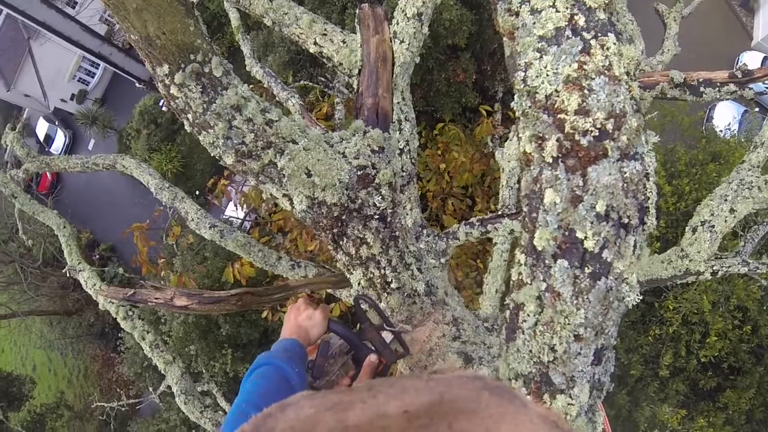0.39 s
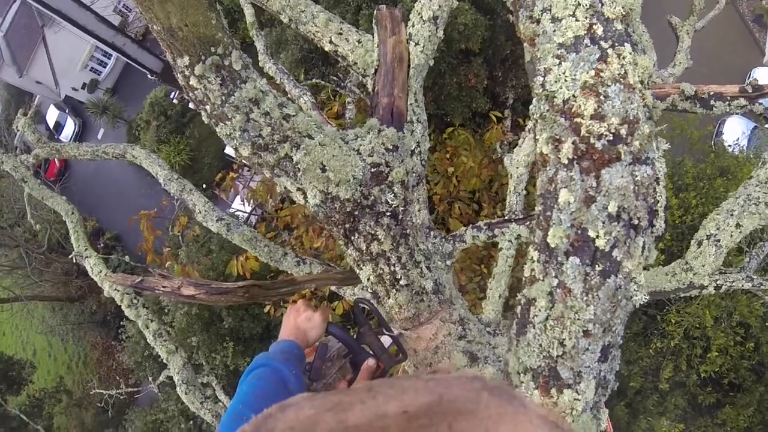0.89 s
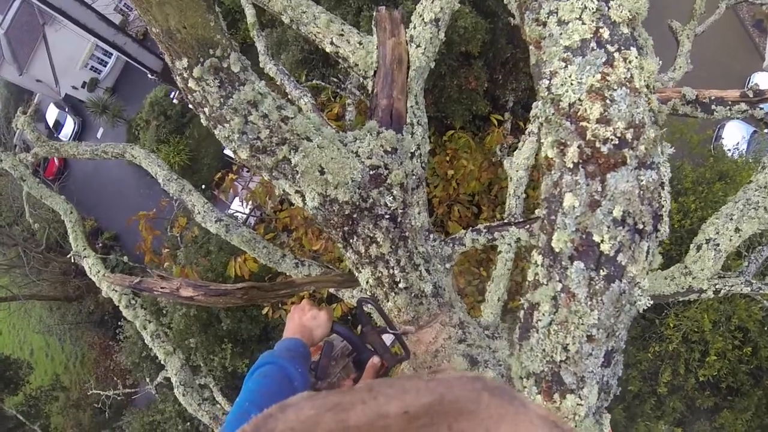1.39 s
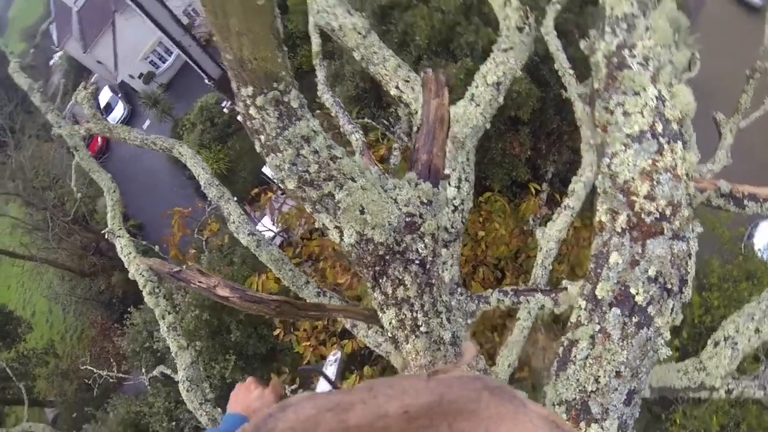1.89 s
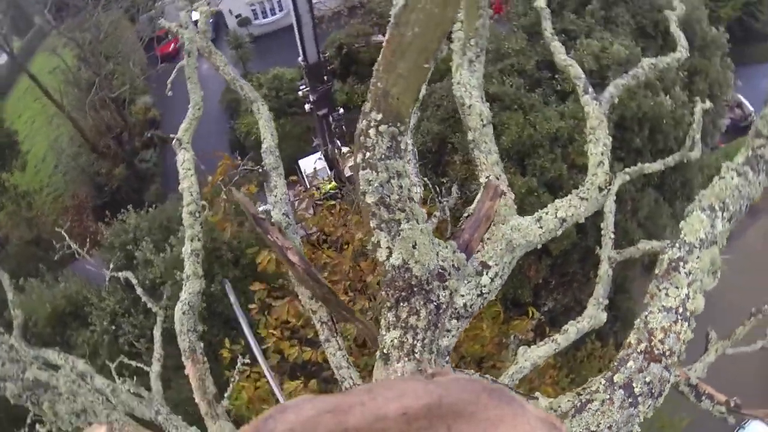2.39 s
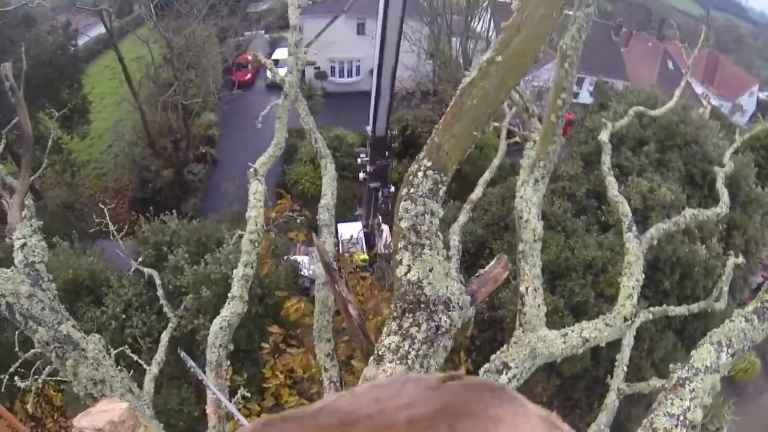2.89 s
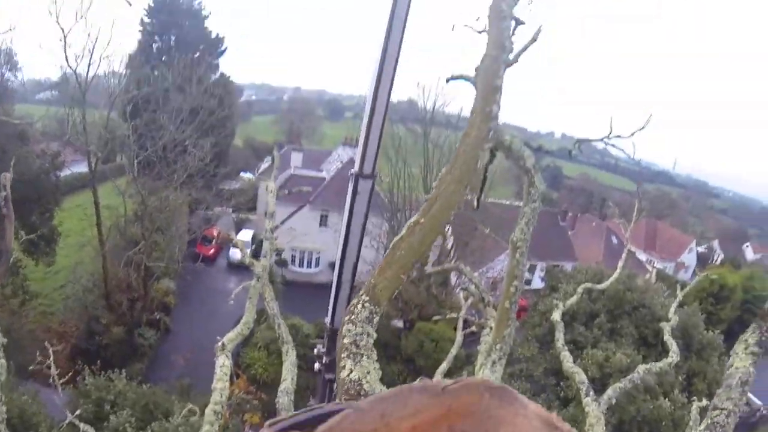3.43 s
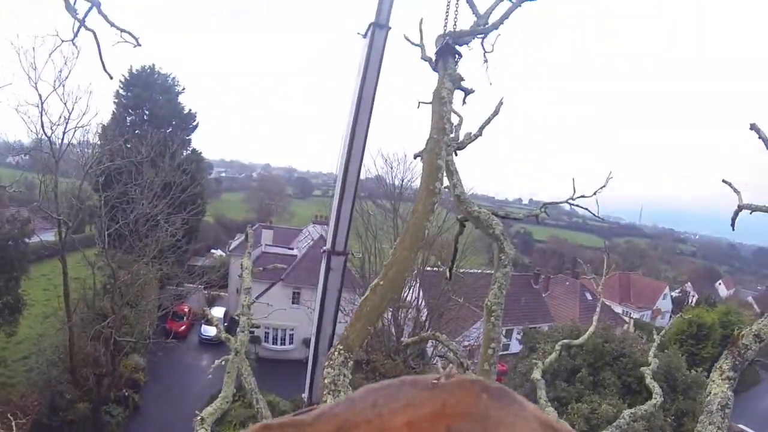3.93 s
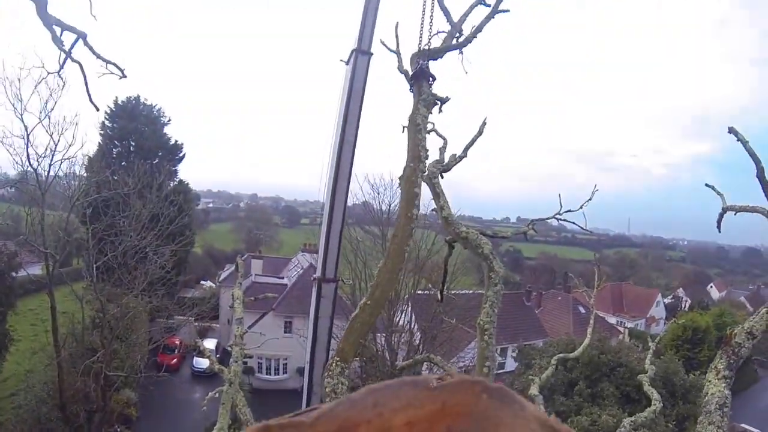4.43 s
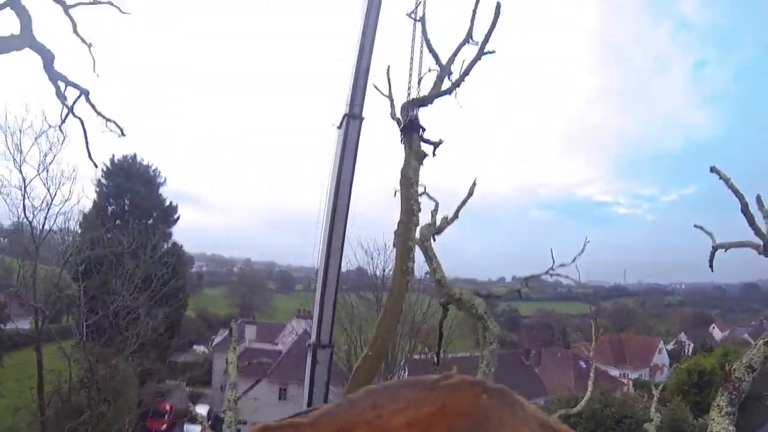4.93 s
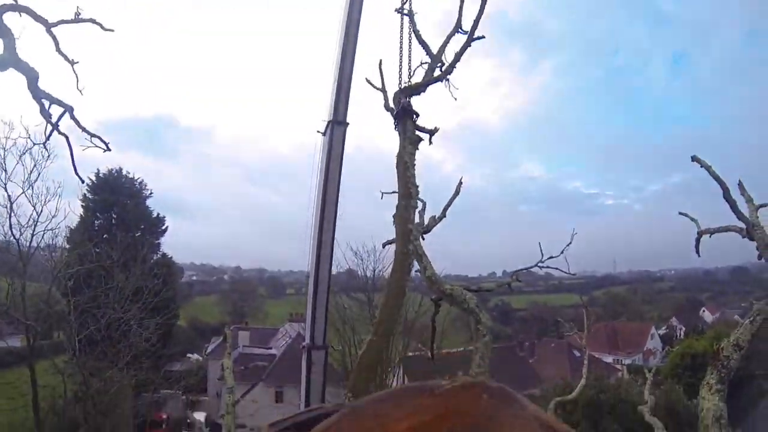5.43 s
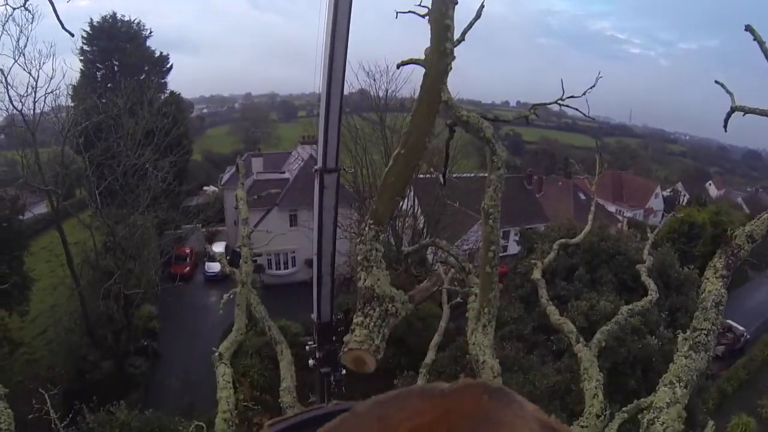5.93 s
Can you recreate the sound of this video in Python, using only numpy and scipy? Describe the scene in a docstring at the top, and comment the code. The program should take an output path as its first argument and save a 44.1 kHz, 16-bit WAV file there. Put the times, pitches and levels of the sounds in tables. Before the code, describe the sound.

Outdoors, up a tree, mono and very close, through a closed helmet-camera case that rings around 1.5 kHz. From 0 s a petrol chainsaw cuts at high revs: dense raspy buzz, throb, whines and chain hiss. It bogs down around 0.5-1.1 s, then climbs to a loud peak near 1.6 s. The throttle is released and the pitch falls steeply, the chain hiss fading, reaching a slow, uneven idle by about 2.5 s. Wind thumps low on the case, strongly near 1.6 and 2.4 s. Knocks and idle pops come between 2.6 and 4.6 s; twigs scrape at 3.0 and 3.3 s, more faintly at 3.9 and 4.6 s. The idle weakens and dies by 4.5 s. Quiet distant wash, faint far diesel hum and a tiny high electronic chirp remain, with gusts at 4.8 and 5.45 s and a sharp loud crack at 5.6 s.

```python
"""Outdoors, in gusty wind: a two-stroke chainsaw finishes a cut at high revs, coasts down,
idles unevenly and is switched off. The microphone sits in a closed helmet-camera case that rings
near 1.5 kHz. The saw is built from clicks at each firing, gated noise, whining sines and chain hiss.
Filtered noise makes the wind thumping on the case, brushing twigs, single knocks and loud idle pops,
and the distant wash; sines make a far diesel's hum and the faint chirp of the camera electronics."""
import sys
import numpy as np
from scipy import signal
from scipy.io import wavfile
from scipy.ndimage import uniform_filter1d

SR = 44100
rng = np.random.default_rng(int(sys.argv[2]) if len(sys.argv) > 2 else 0)


def boost_factor(decibels):
    """Convert a level in decibels to a linear amplitude factor."""
    exponent = np.asarray(decibels, float) / 20
    return 10 ** exponent


def unload_wav(signal):
    """Save mono or channel-first audio to the path in sys.argv[1] as 16-bit WAV at rate SR, clipped to [-1, 1]."""
    wavfile.write(
        sys.argv[1],
        SR,
        np.round(np.clip(np.atleast_2d(signal).T, -1, 1) * 32767).astype(np.int16),
    )


N = 267246
T = np.arange(N) / SR
HZ = np.fft.rfftfreq(8192, 1 / SR)
RING_BAND = (1100, 2500)  # Hz, where the case rings: many levels are set in this band
# Engine speed while cutting, coasting down and idling. Each row: time in seconds, crank turns in Hz.
CRANK_SPEED = [(0.0, 169.7), (0.05, 172.3), (0.16, 162.8), (0.32, 165.5), (0.5, 143.4), (0.74, 138.8),
               (1.14, 152.5), (1.24, 161.3), (1.43, 187), (1.5, 190.3), (1.63, 198.7), (1.73, 167.9),
               (1.96, 113.6), (2.14, 82.6), (2.26, 65.43), (2.45, 50.4), (2.55, 48.35), (2.95, 46.76),
               (3.6, 50.7), (4.5, 52.8)]


def read(points, hz):
    """Spectrum value, straight on a log-frequency axis."""
    f, value = np.transpose(points)
    return np.interp(np.log(hz + 1), np.log(f + 1), value)


def columns(rows):
    """Every column of a curve table after the time, one value a sample."""
    s, *values = np.transpose(rows)
    return [np.interp(T, s, v) for v in values]


def causal(db):
    """Minimum-phase impulse response of a spectrum on HZ."""
    log_gain = np.log(boost_factor(np.maximum(db, -130)))
    circle = np.concatenate([log_gain, log_gain[-2:0:-1]])
    return np.fft.ifft(np.exp(np.conj(signal.hilbert(circle)))).real


def coloured(x, db, lo, hi):
    """Filters x so that white input of rms 1 has rms 1 between lo and hi."""
    inside = (HZ >= lo) & (HZ <= hi)
    return signal.oaconvolve(x, causal(db))[:N] / np.sqrt(np.mean(inside * boost_factor(db) ** 2))


def patchy(db, rate_hz):
    """Gain that wanders at random, with a spread of db and no faster than about rate_hz."""
    slow = signal.sosfilt(signal.butter(2, rate_hz, fs=SR, output="sos"), rng.standard_normal(N))
    return boost_factor(db * slow / slow.std())


def pulses(at, size):
    """One click at each fractional sample place, shared between its two neighbours."""
    at = np.clip(at, 0, N - 2)
    whole = at.astype(int)
    return np.bincount(whole, size * (1 - at % 1), N) + np.bincount(whole + 1, size * (at % 1), N)


def case_db(hz):
    """Sound through the case wall plus the ringing of the air inside, added as powers."""
    # Resonances of the camera case. Each row: centre in Hz, width in Hz, level in dB.
    resonances = [(1516, 63, 2), (1915.5, 24, -4.5), (2201, 74, -13), (2725, 91, -16.5), (3068, 67, -15),
                  (3680, 140, -20), (5250, 530, -38.5), (6430, 200, -39), (7860, 110, -34)]
    # Sound passing the wall. Each row: frequency in Hz, level in dB.
    wall = [(100, -27), (800, -17), (1050, -22), (1350, -10.5), (1750, -11), (2400, -27), (3500, -23),
            (4600, -35), (8000, -44), (8800, -48), (10200, -40), (13500, -46.5), (15300, -52)]
    rings = sum(boost_factor(db) ** 2 / (1 + (2 * (hz - f) / width) ** 2) for f, width, db in resonances)
    return 10 * np.log10(rings + boost_factor(read(wall, hz)) ** 2)


def outdoors():
    """Distant wash as steady filtered noise, and the wavering orders of a far diesel as sines."""
    # Wash as heard inside the case. Each row: frequency in Hz, level in dB.
    wash_colour = [(88, -44.5), (150, -6), (234, -10), (279, -6.5), (444, -15), (569, -10.5), (770, -17),
                   (841, -11), (936, -21), (1380, 2.5), (2320, -16.5), (10500, -48.5), (13600, -91),
                   (22000, -120)]
    # Orders of the far diesel. Each row: frequency in Hz, rms level in dB before it wavers.
    orders = [(285.3, -73), (850.6, -76)]
    wash = coloured(rng.standard_normal(N), read(wash_colour, HZ), *RING_BAND)
    hum = sum(boost_factor(db) * np.sqrt(2) * patchy(3, 3) * np.sin(2 * np.pi * hz * T) for hz, db in orders)
    wash_db = -48
    return boost_factor(wash_db) * patchy(0.27, 23.98) * wash + hum


def camera():
    """A thin high tone switched on for part of every frame, over the microphone's own hiss."""
    chirp_hz, chirp_peak_db = 11440, -66.5
    frame_hz, first_s, burst_s = 60 / 1.001, 0.0079, 0.0074
    on = (T - first_s) % (1 / frame_hz) < burst_s
    envelope = uniform_filter1d(on * 1., 20)  # softens the switching edges
    chirp = boost_factor(chirp_peak_db) * envelope * np.sin(2 * np.pi * chirp_hz * T)
    # white noise at -74.5 dB, tilted gently towards the lows
    hiss = boost_factor(-74.5) * signal.lfilter([1], [1, -.3], rng.standard_normal(N))
    return chirp + hiss


def wind():
    """Lumpy pressure on the case: slow thumps and a rumble above them, both swelling with each gust."""
    # Each row: time of full strength in seconds, hold in seconds, thump level in dB, rumble level in dB.
    gusts = [(0.104, 1.35, -34, -54.5), (1.62, 0.068, -24, -38.5), (1.77, 0, -41, -39.5),
             (1.885, 0.5, -31, -49.5), (2.43, 0, -20, -46), (2.55, .2, -32, -46), (2.86, .4, -33, -50),
             (3.384, 0.72, -45, -51.5), (4.79, 0.026, -28, -41), (4.94, 0.11, -58, -49.5),
             (5.45, 0.068, -28, -48.5), (5.69, 0.011, -30, -49)]
    # Colour of the thumps. Each row: frequency in Hz, level in dB.
    thump_colour = [(3, 2.5), (10, 12.5), (25, -4), (50, -11.5), (120, -82), (600, -120)]
    # Colour of the rumble. Each row: frequency in Hz, level in dB.
    rumble_colour = [(30, -0.5), (60, 5), (95, 5), (130, -4.5), (200, -24), (400, -26), (1500, -120)]
    rise_db_s, fall_db_s = 130, 118  # dB per second, before and after each gust
    calm_db = (-43, -54)  # thump and rumble between the gusts
    power = boost_factor(calm_db)[:, None] ** 2 * np.ones(N)
    for s, hold, *db in gusts:
        rise_db = np.minimum(rise_db_s * (T - s), 0)
        fall_db = fall_db_s * np.maximum(T - s - hold, 0)
        power = power + boost_factor(np.array(db)[:, None] + rise_db - fall_db) ** 2
    thump = coloured(rng.standard_normal(N), read(thump_colour, HZ), 5, 40)
    rumble = coloured(rng.standard_normal(N), read(rumble_colour, HZ), 60, 120)
    return np.sqrt(power[0]) * thump + np.sqrt(power[1]) * patchy(1.25, 33) * rumble


def brushing():
    """Twigs scraping past: a dense crackle of random grains of very unequal strength."""
    # Each row: start in seconds, length in seconds, level in dB.
    strokes = [(3.024, 0.21, -33.5), (3.329, .12, -39), (3.946, 0.33, -57), (4.613, 0.11, -44.5)]
    # Colour of the scrape outside the case. Each row: frequency in Hz, level in dB.
    scrape_colour = [(500, -10.5), (1350, 7.5), (1900, -0.5), (3000, 1), (8000, -2.5), (12000, -44)]
    stroke = sum(boost_factor(db) * np.sin(np.pi * np.clip((T - s) / length, 0, 1)) ** .5
                 for s, length, db in strokes)
    strength = boost_factor(5.3 * np.minimum(rng.exponential(1, N), 3))
    grains = strength * rng.standard_normal(N) * (rng.random(N) < 3000 / SR)  # about 3000 a second
    return stroke * coloured(grains / grains.std(), read(scrape_colour, HZ) + case_db(HZ), *RING_BAND)


def cracks_and_pops():
    """Single knocks and loud idle pops: short dying noise cracks with a low ring of the helmet."""
    # Each row: start in seconds, crack peak in dB, brightness at 8 kHz against 1.5 kHz in dB,
    # time for the noise to die by 60 dB in seconds.
    cracks = [(2.578, -29, 1, .04), (2.8659, -22, 4.5, 0.065), (3.1658, -29, -4, 0.039),
              (3.4858, -29, -8, 0.046), (3.5652, -28, -9, 0.034), (3.6595, -31, -9, 0.042),
              (3.6914, -32, -8, .04), (3.7547, -24, -15, 0.055), (4.1259, -29, -10, .04),
              (4.1611, -35, -7, 0.036), (4.6354, -29, -30, 0.068), (5.604, -16.5, -2.5, 0.026),
              (5.6118, -32, -16, 0.01)]
    # Colour shared by all cracks. Each row: frequency in Hz, level in dB.
    crack_colour = [(500, -38), (1000, -6), (1300, 0.5), (9000, -2), (12000, -40)]
    # Low ring of the helmet. Each row: frequency in Hz, 60 dB decay time in seconds.
    helmet = [(340, 0.28), (700, 0.049)]
    ring_db = -27  # each helmet tone against the crack's peak
    out = np.zeros(N)
    t = T[:8192]
    ring = sum(np.sin(2 * np.pi * hz * t) * boost_factor(-60 * t / t60) for hz, t60 in helmet)
    octaves = np.log2(np.maximum(HZ, 1000) / 1500) / np.log2(8000 / 1500)
    for (s, db, bright_db, t60), noise in zip(cracks, rng.standard_normal((len(cracks), len(t)))):
        colour_db = read(crack_colour, HZ) + bright_db * octaves  # tilt: 0 at 1.5 kHz, full at 8 kHz
        crack = signal.fftconvolve(noise * boost_factor(-60 * t / t60), causal(case_db(HZ) + colour_db))[:len(t)]
        part = out[round(s * SR):][:len(t)]
        part += boost_factor(db) * (crack / abs(crack).max() + boost_factor(ring_db) * ring)[:len(part)]
    return out


def by_throttle(shut, idle, values):
    """Moves from the full-throttle value to the shut one, then on to idle."""
    return values[0] + (values[1] - values[0]) * shut + (values[2] - values[1]) * idle


def chain(hz, shut, loud_db):
    """Hiss of the chain: dull in the wood, brighter running free, fading as the clutch lets go."""
    # Chain in the wood or at rest. Each row: frequency in Hz, level in dB.
    dull_colour = [(3000, -5), (6000, 2.5), (9000, 1), (12000, -4), (13800, 1), (15200, -2)]
    # Chain out of the wood. Each row: frequency in Hz, level in dB.
    free_colour = [(7000, -20), (10000, -6), (11800, 9), (13000, -1), (15200, -10)]
    top_band = (12000, 15000)  # Hz
    cutting_db, free_db, resting_db = -62.5, -62.5, -43.5  # the last against the saw's loudness
    clutch_hz, clutch_db_per_hz = 91.78, 0.4  # below this crank speed the drive fades
    above_idle = np.clip(hz / CRANK_SPEED[-1][1] - 1, 0, .1) * 10
    drive = boost_factor(-clutch_db_per_hz * np.maximum(clutch_hz - hz, 0)) * above_idle
    air = case_db(HZ)
    dull = coloured(rng.standard_normal(N), read(dull_colour, HZ) + air, *top_band)
    free = coloured(rng.standard_normal(N), read(free_colour, HZ) + air, *top_band)
    out = (boost_factor(cutting_db) * drive + boost_factor(loud_db + resting_db) * (1 - drive)) * dull
    return out + boost_factor(free_db) * shut * drive * free


def whines(hz, turns, shut):
    """The crank tone grows with speed; the higher orders light up in the housing resonances."""
    # Whines of sprocket teeth, fan fins and their octaves. Each row: multiple of the crank turns,
    # level in dB, change with the throttle shut in dB, crank speed under which it dies in Hz.
    orders = [(6, 0, 3, 92), (12, 0, 6, 126), (7, 0, -14, 130), (14, -18, -6, 130)]
    # Resonances each whine excites as it sweeps through. Each row: centre in Hz, width in Hz, level in dB.
    housing = [(640, 120, -45.5), (842, 300, -43), (1090, 97, -41.5), (1330, 210, -36), (1557.5, 79, -39),
               (1697.6, 52.4, -26.5), (1965, 23, -25), (2230, 84, -29.5), (2720, 76, -15)]
    # level at 170 turns a second, dB per octave of speed, change with the throttle shut
    crank_db = -34 + 19 * np.log2(hz / 170) - 10 * shut
    out = boost_factor(crank_db) * patchy(0.96, 8.3) * np.sin(2 * np.pi * turns)
    for k, db, shut_db, end_hz in orders:
        gain = np.sqrt(sum(boost_factor(top) ** 2 / (1 + (2 * (k * hz - f) / width) ** 2) ** 2
                           for f, width, top in housing))
        gain *= boost_factor(db + shut_db * shut) / (1 + (end_hz / hz) ** 24)
        out += gain * patchy(3.3, 7.6) * np.sin(2 * np.pi * k * turns)
    return np.sqrt(2) * out  # levels above are rms


def firings(hz, turns, shut, idle):
    """One firing a turn: crankcase clicks, exhaust clicks scattered in time and size, and the sizes."""
    # full throttle, just shut, idling
    uneven_db = by_throttle(shut, idle, (.6, 2.8, 5.5))
    scatter_ms = by_throttle(shut, idle ** 1.28, (.02, .15, 2.2))
    at = np.interp(np.arange(1, turns[-1]), turns, np.arange(N))
    i = at.astype(int)
    luck = np.clip(rng.standard_normal((1200, 3))[:len(at)], -2, 2)
    size = boost_factor(uneven_db[i] * (luck[:, 0] - 0.17 * uneven_db[i]))
    late = luck[:, 1:].T * scatter_ms[i] * SR / 1000  # samples
    level = np.sqrt(SR / hz[i])  # evens out the power of clicks at any speed
    # the crank coasts evenly and only stumbles once it idles
    pumped = pulses(at + 0.62 * idle[i] ** 3 * late[0], level)
    fired = pulses(at + late[1], level * size)
    return pumped, fired, size


def body_buzz(fired):
    """Each firing shakes the metal body, which spreads the click over a few milliseconds."""
    # Clean buzz outside the case. Each row: frequency in Hz, level in dB.
    colour = [(700, -30), (1100, -1), (1500, -4), (2000, 3), (2500, -4), (2900, -6), (4200, -5),
              (6000, -16)]
    t60 = .02  # s
    shake = rng.standard_normal(1024) * boost_factor(-60 * T[:1024] / t60)
    rung = signal.oaconvolve(fired, shake / np.linalg.norm(shake))[:N]
    return coloured(rung, read(colour, HZ) + case_db(HZ), *RING_BAND)


def rasp(turns, size, shut, idle):
    """Noise that swells on each crank turn and follows the firing's strength by half."""
    # Rasp outside the case. Each row: frequency in Hz, level in dB.
    rasp_colour = [(200, -26), (950, -22), (1350, 0), (4000, 0), (7000, 2), (11000, -6), (15000, -30)]
    # Idling metalwork as heard inside the case. Each row: frequency in Hz, level in dB.
    rattle_colour = [(530, -51), (900, -45), (1210, -6), (1380, -11), (1490, -3), (1780, -1), (1950, 4),
                     (2230, -21), (2470, -6), (4000, -25.5), (9000, -58), (11700, -92), (19800, -120)]
    beat = by_throttle(shut, idle, (.3, .3, .7))  # depth of the swell, 0-1
    strength = np.sqrt(np.append(1, size))[turns.astype(int)]
    swell = 1 - beat + 1.75 * beat * np.exp(-(turns % 1) / 0.61)
    puff = swell * strength * patchy(0.15, 24)
    puff *= rng.standard_normal(N)
    rattle = idle ** .8  # share of loose metalwork, as power
    out = np.sqrt(1 - rattle) * coloured(puff, read(rasp_colour, HZ) + case_db(HZ), *RING_BAND)
    return out + np.sqrt(rattle) * coloured(puff, read(rattle_colour, HZ), *RING_BAND)


def saw():
    """Crankcase throb, uneven exhaust pops, body buzz, gated rasp, whines and chain hiss, summed."""
    # The saw is worked and lowered. Each row: time in seconds, loudness in dB,
    # level of the exhaust pops against the saw's loudness in dB, before the throttle's own offset.
    handling = [(0, -22.5, -3), (.21, -22, -4.5), (.54, -23.5, -9), (1.25, -23, -5), (1.35, -20, -7.5),
                (1.47, -20, -15), (1.64, -18.5, -14.5), (1.88, -23, -10.5), (2.08, -29.5, -16.5),
                (2.45, -34.5, -3.5), (2.95, -40, -1.5), (3.13, -35, 0.5), (3.25, -37.5, -6),
                (3.85, -40.5, -6), (4.15, -40, -8), (4.28, -46.5, -10), (4.5, -63, -6)]
    # Crankcase throb. Each row: frequency in Hz, level in dB.
    throb_colour = [(100, -37.5), (190, 1.5), (260, 3), (350, 0.5), (430, -9.5), (550, -46), (900, -68)]
    # Exhaust pops. Each row: frequency in Hz, level in dB.
    exhaust_colour = [(300, -61), (450, -3.5), (600, 8), (720, 10.5), (850, -13), (1100, -33), (1400, 16.5),
                      (2500, -47.5)]
    # trigger let go, time for the throttle to close, time to settle to idle, silent after switch-off
    release_s, shut_s, settle_s, stop_s = 1.63, 0.11, 1.111, 4.5
    hz = columns(CRANK_SPEED)[0]
    turns = np.cumsum(hz) / SR
    loud_db, exhaust_db = columns(handling)
    shut = np.clip((T - release_s) / shut_s, 0, 1)
    idle = np.clip((T - release_s) / settle_s, 0, 1)
    # full throttle, just shut, idling; pops and buzz are set against the loudness
    throb_db = by_throttle(shut, idle, (-35.5, -43.5, -43)) + 0.25 * loud_db  # follows it in part
    pop_db = loud_db + by_throttle(shut, idle, (-9, -9, -10)) + exhaust_db
    buzz_db = loud_db + by_throttle(shut, idle, (-3, -16, -18))
    pumped, fired, size = firings(hz, turns, shut, idle)
    out = boost_factor(throb_db) * coloured(pumped, read(throb_colour, HZ), 200, 420) * patchy(1.2, 11)
    out += boost_factor(pop_db) * coloured(fired, read(exhaust_colour, HZ), 500, 900)
    out += boost_factor(buzz_db) * body_buzz(fired)
    out += boost_factor(loud_db - 3) * rasp(turns, size, shut, idle)
    out += chain(hz, shut, loud_db) + whines(hz, turns, shut)
    return out * np.clip((stop_s - T) / 0.14, 0, 1)  # dies over the last 0.14 s


def scene():
    """All sources, in mono."""
    return (outdoors() + camera() + wind() + brushing() + cracks_and_pops() + saw())[None]


def band_limit(x):
    """A steep low-pass at the top of the band."""
    return signal.sosfilt(signal.butter(12, 15290, fs=SR, output="sos"), x)


def record(dry):
    """Cuts everything above 15180 Hz with a steep filter and finishes the mix."""
    lowpass = signal.firwin(1023, 15180, window=("kaiser", 9), fs=SR)
    mix = signal.oaconvolve(dry, lowpass[None], "same")
    return band_limit(mix)


dry = scene()
out = record(dry)
unload_wav(out)
```